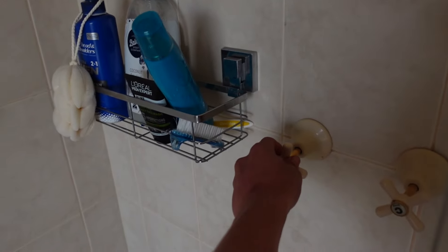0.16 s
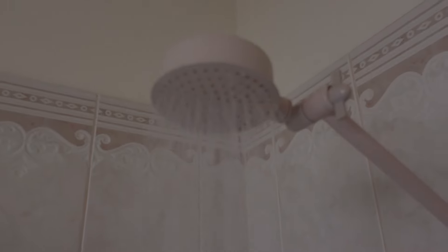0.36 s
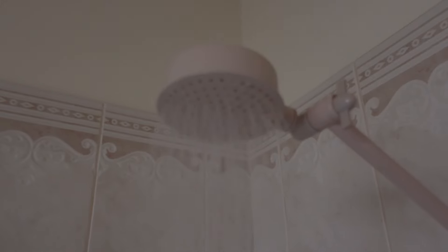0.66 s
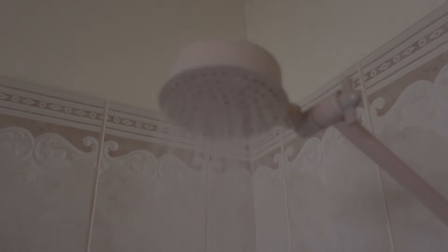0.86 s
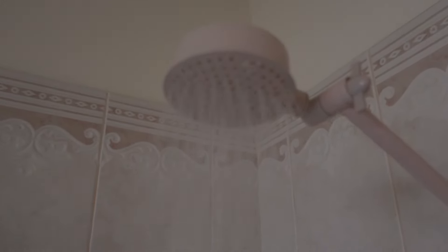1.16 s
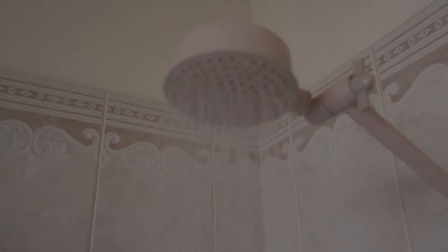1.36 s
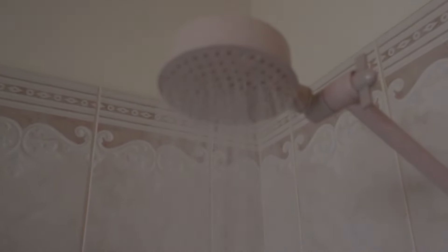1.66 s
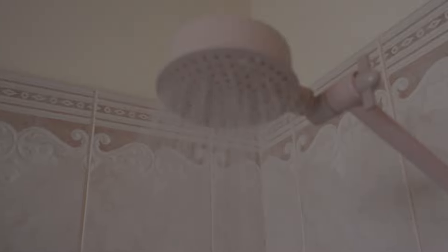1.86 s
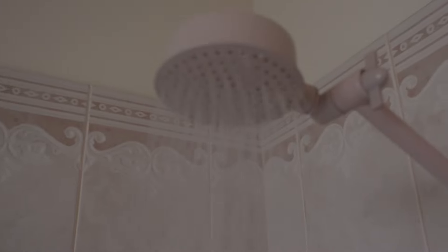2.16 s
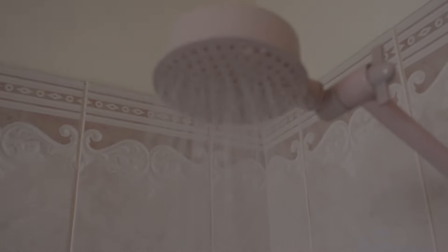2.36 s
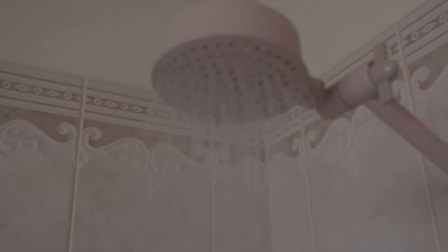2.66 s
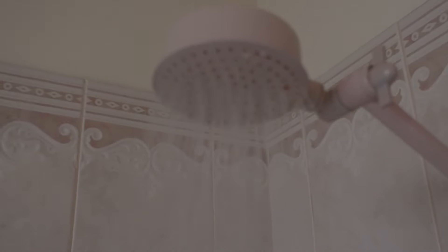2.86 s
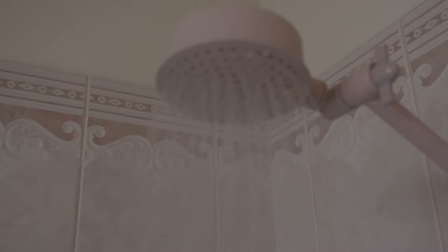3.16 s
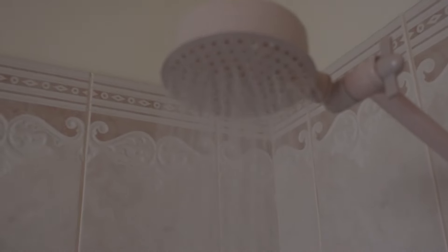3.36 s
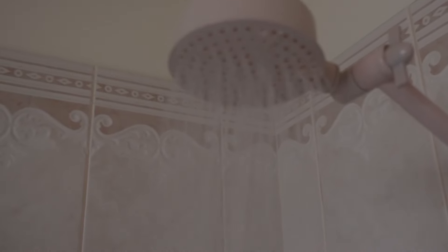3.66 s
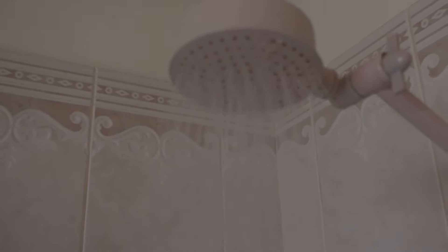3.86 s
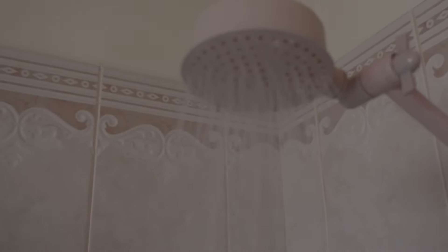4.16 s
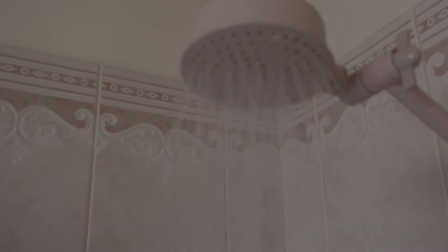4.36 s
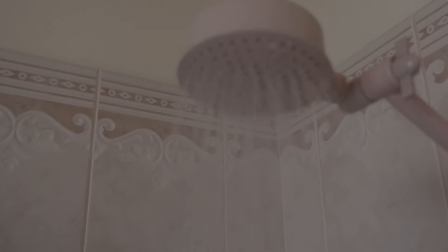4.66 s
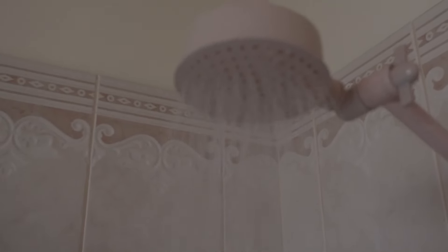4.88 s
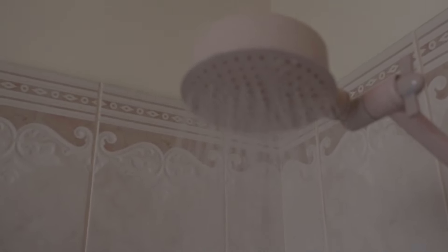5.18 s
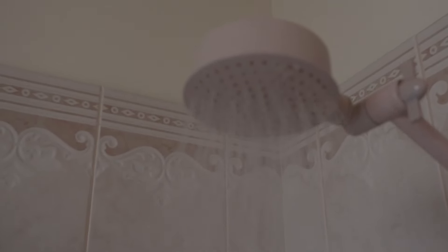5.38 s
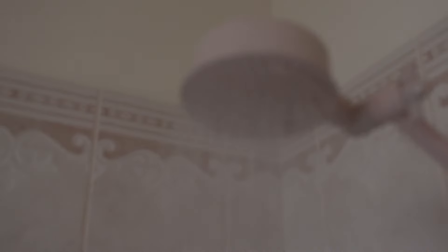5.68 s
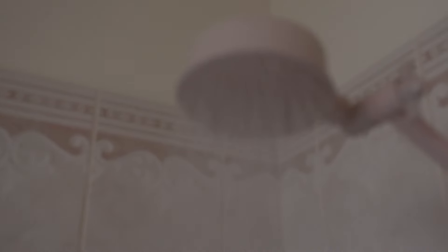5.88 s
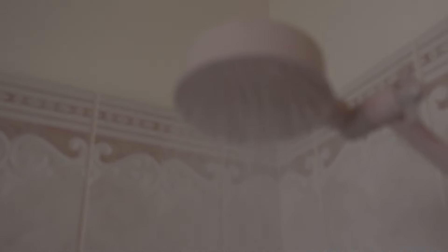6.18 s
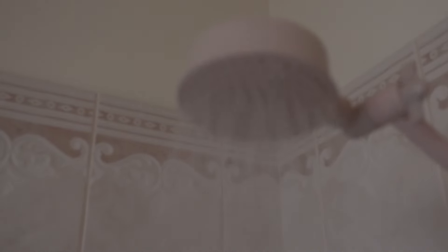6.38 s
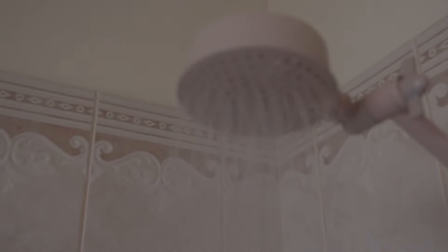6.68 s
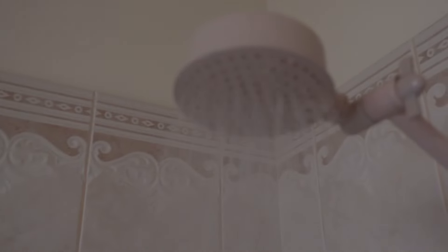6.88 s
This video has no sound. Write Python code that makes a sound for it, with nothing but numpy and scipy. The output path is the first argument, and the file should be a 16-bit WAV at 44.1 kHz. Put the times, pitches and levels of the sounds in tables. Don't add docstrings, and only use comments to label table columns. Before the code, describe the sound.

Close stereo microphone beside a tiled shower stall. Faint room air and small handle clicks last only a moment before a quick cut to full spray. The thin, bright hiss stays steady but flickers with small surges; heavy drops slap nearby, little hollow bubbles chirp and ring in the drain, and a low pipe note wavers underneath until the end, still running.

```python
import sys
import numpy as np
from scipy import signal
from scipy.io import wavfile
from scipy.ndimage import uniform_filter1d

SR = 44100
rng = np.random.default_rng(int(sys.argv[2]) if len(sys.argv) > 2 else 0)


def wav_out(sig):
    wavfile.write(sys.argv[1], SR, np.round(np.clip(np.atleast_2d(sig).T, -1, 1) * 32767).astype(np.int16))


def invert_db(x):
    u = np.asarray(x, float) / 20
    return 10 ** u


N = 310023

# (frequency [Hz], level per Hz [dB])
SPRAY_COLOUR = [(1060, -39), (1800, -11), (1940, -9), (2570, -2), (8750, 2), (14200, 0), (15300, -2),
                (15900, -6.5)]
# (frequency [Hz], width [Hz], level over the wash [dB])
STALL_RESONANCES = [(222, 25, 3), (265, 12, 8), (339, 14, 4), (552, 20, 5), (876, 20, 3), (1015, 22, 7),
                    (1055, 16, 6), (1188, 20, 2), (1641, 30, 4), (1712, 30, 3), (1752, 30, 3),
                    (2606, 20, 11)]


def evened(x):
    return x / np.sqrt(np.mean(x ** 2) + 1e-20)


def read(points, hz):
    f, value = np.transpose(points)
    return np.interp(np.log(hz + 1), np.log(f + 1), value)


def humps(modes, hz):
    power = 1
    for f, width, db in modes:
        power = power + invert_db(db) ** 2 / (1 + (2 * (hz - f) / width) ** 2)
    return np.sqrt(power)


def add(mix, s, sound, pan_db):
    part = mix[:, round(s * SR):][:, :sound.shape[-1]]
    sides = invert_db(np.array([[pan_db / 2], [-pan_db / 2]]))
    part += (sound * sides)[:, :part.shape[1]]


def high_passed(x, order, hz):
    return signal.sosfilt(signal.butter(order, hz, "highpass", fs=SR, output="sos"), x)


def chance(frames, bins, time_size, hz_size):
    field = rng.standard_normal((frames, bins)).T
    field = uniform_filter1d(field, hz_size, 0)
    return evened(uniform_filter1d(field, time_size, 1))


def wide_noise(gain, size):
    # (frequency [Hz], correlation [0-1])
    likeness = [(60, 0.96), (180, 0.99), (550, 0.9), (1650, 0.81), (4970, 0.69), (15000, 0.59)]
    # (frequency [Hz], left minus right [dB])
    balance = [(60, 0.0), (240, 0.0), (600, -1.2), (950, -0.8), (3770, -1.3), (15000, 1.2)]
    hz = np.fft.rfftfreq(size, 1 / SR)[:, None]
    a, b, c, d = rng.standard_normal(gain.shape[::-1] + (4,)).T
    same, lean = read(likeness, hz), invert_db(read(balance, hz) / 2)
    left = a + 1j * b
    right = same * left + np.sqrt(1 - same ** 2) * (c + 1j * d)
    z = np.array([left * lean, right / lean]) * gain
    return signal.istft(z, nperseg=size, noverlap=size * 3 // 4)[1][:, :N]


def burst(hz, turns, seed):
    t = np.arange(len(seed)) / SR
    ring = np.exp(-t * hz / turns) * np.sin(2 * np.pi * hz * t)
    pop = np.diff((1 - np.exp(-t * hz * 3)) * ring)
    rough = seed * (t / .0008) * np.exp(-t / 0.00078)
    x = np.convolve(rough, pop)[:len(seed)]
    return x / abs(x).max()


def quiet_room(air_db=-60):
    # (frequency [Hz], level per Hz [dB])
    air_colour = [(59, -67), (100, -28), (719, -3), (1030, -8), (1360, -5.5), (1990, -10), (3040, -12),
                  (3680, -19), (6250, -22), (15900, -30)]
    # (frequency [Hz], width [Hz], level over the air [dB])
    air_whistles = [(1370, 40, 15.5), (3050, 70, 11), (450, 88, 4.2)]
    # (time [s], peak level [dB], frequency [Hz], ring t60 [s])
    handle_clicks = [(.089, -30, 2970, .011), (.0892, -37, 1500, .024), (.089, -31, 5100, .0036),
                     (.0891, -36, 8500, .003), (.089, -42, 900, .012), (.0905, -35, 2100, .034),
                     (.0945, -24, 5200, .003), (.0945, -33, 9100, .0026), (.0945, -34, 2800, .006),
                     (.158, -50, 1300, .012), (.159, -53, 3000, .012), (.159, -55, 5200, .005),
                     (.159, -43, 430, .045), (.158, -50, 800, .01)]
    # (start [s], length [s], level [dB], from frequency [Hz], to frequency [Hz])
    squeak = (.192, .036, -61, 480, 760)
    hz = np.fft.rfftfreq(1024, 1 / SR)[:, None]
    patches = invert_db(2.0 * chance(60, 513, time_size=3, hz_size=12))
    gain = invert_db(read(air_colour, hz)) * humps(air_whistles, hz) * patches
    out = invert_db(air_db) * evened(wide_noise(gain, size=1024))

    t = np.arange(4000) / SR
    for s, db, f_hz, t60 in handle_clicks:
        onset = np.minimum(t * f_hz, 1)
        add(out, s, invert_db(db - 60 * t / t60) * onset * np.sin(2 * np.pi * f_hz * t), 0)

    s, length, db, from_hz, to_hz = squeak
    u = np.minimum(t / length, 1)
    turns = np.cumsum(from_hz + (to_hz - from_hz) * u ** .7) / SR
    add(out, s, invert_db(db) * np.sin(np.pi * u ** 1.5) * np.sin(2 * np.pi * turns), 0)
    return np.pad(out, ((0, 0), (0, N - out.shape[1])))


def hum_level(t, rise_db_per_s=350, fall_db_per_s=350, rest_db=-76):
    # (start [s], hold [s], level [dB])
    hum_spells = [(0.284, 0.076, -57), (0.462, .06, -58), (.58, 0.16, -54.5), (0.795, .05, -55),
                  (.9, 0.15, -62.5), (1.094, 0.33, -52), (1.51, 0.026, -59), (1.62, 0.17, -68),
                  (1.98, .12, -66), (2.186, 0.19, -56.5), (2.44, .07, -59), (2.56, 0.045, -53.5),
                  (2.676, .08, -55.5), (2.82, 0.17, -64.5), (3.3, .12, -68), (3.52, .15, -60.5),
                  (3.72, 0.062, -55), (3.847, 0.19, -61.5), (4.15, 0.12, -65.5), (4.35, .09, -58.5),
                  (4.505, 0.13, -58), (4.693, 0.22, -61.5), (5.0, 0.19, -58), (5.38, .1, -67),
                  (5.516, 0.09, -60), (6.52, .28, -68)]
    coarse = t[::64]
    start, hold, db = np.transpose(hum_spells)[:, :, None]
    rising_db = rise_db_per_s * np.maximum(start - coarse, 0)
    falling_db = fall_db_per_s * np.maximum(coarse - start - hold, 0)
    spell_db = (db - rising_db - falling_db).max(0)
    level = invert_db(np.maximum(spell_db, rest_db))
    return np.interp(t, coarse, uniform_filter1d(level, size=12))


def hum(note_hz=287, width_hz=4.4, wobble_db=1.1, rumble_db=-13):
    t = np.arange(N) / SR
    r = np.exp(-np.pi * width_hz / SR)
    wander = evened(signal.lfilter([1], [1, -r], rng.standard_normal(N)))
    wobble = uniform_filter1d(rng.standard_normal(N), size=1300)
    wobble = evened(uniform_filter1d(wobble, size=1300))
    side_phase = np.array([[.18], [-.18]])
    phase = 2 * np.pi * note_hz * t + 0.53 * wander + side_phase
    note = np.sqrt(2) * invert_db(wobble_db * wobble) * np.sin(phase)
    rumble = evened(signal.lfilter(*signal.iirpeak(101, 8, SR), rng.standard_normal(N)))
    level = hum_level(t)
    return level * note + invert_db(rumble_db) * np.sqrt(level * level.mean()) * rumble


def flow(t, surge_rise_s=0.014, wash_under_db=-10.5, wash_follows=0.85):
    # (time [s], spray level [dB], drop size as coarse over fine [dB])
    water_flow = [(.3, -31, -4.5), (.75, -32.5, -4.5), (1.1, -32, -2), (1.45, -31, -5), (1.75, -33.5, -3.5),
                  (2.0, -32, -2), (2.25, -34.5, -1.5), (2.42, -35.5, -2.5), (2.9, -31, -5),
                  (3.55, -32.5, -4), (4.1, -32, -3), (4.4, -31.5, -4), (4.72, -33.5, -4), (5.0, -31.5, -2),
                  (5.55, -32.5, 0), (6.0, -31.5, -1), (6.5, -32.5, -1), (7.03, -32, 0)]
    # (time [s], swell [dB], fade [s], coarse share [0-1])
    surges = [(.71, 12, 0.045, 0.98), (.86, 4.5, .06, 1), (1.15, 8, 0.014, 0.3), (1.26, 6, 0.097, 1),
              (1.4, 3.5, 0.053, 0.5), (1.54, 0, 0.036, 1), (1.85, 11, 0.092, 0.44), (2.15, 6.5, 0.18, 0.1),
              (2.61, 5, 0.026, 0), (2.82, 5.5, 0.1, 1), (3.07, 3.5, 0.036, 0.5), (3.82, 4.5, 0.067, .3),
              (4.26, 7, 0.023, 0), (4.475, 10.5, 0.13, 0.76), (4.83, 6.5, 0.13, 0.7), (5.09, 3, 0.077, 0),
              (5.65, 5.5, .15, 0.36), (6.17, -1.5, .05, 0.2), (6.549, 6, 0.16, 0.84)]
    s, level_db, coarse_db = np.transpose(water_flow)
    base_db, size_db = np.interp(t, s, level_db), np.interp(t, s, coarse_db)
    at, swell_db, fade_s, share = np.transpose(surges)[:, :, None]
    late = np.maximum(t - at, 0)
    swell = swell_db * np.minimum(late / surge_rise_s, 1) * np.exp(-late / fade_s)
    mist_db = base_db + (swell * (1 - share ** 2)).sum(0)
    spray_db = base_db + size_db + (swell * share).sum(0)
    usual_db = level_db.mean()
    wash_db = usual_db + wash_under_db + wash_follows * (base_db - usual_db)
    return mist_db, spray_db, wash_db


def wash(patchy_db=2.5, shake_follows=0.47, shake_hz=260):
    # (frequency [Hz], level per Hz [dB])
    wash_colour = [(30, -20), (60, -22), (100, -34), (175, -64), (215, -23), (400, -25.5), (500, -14.5),
                   (790, -9.5), (1000, -7.5), (1300, 2), (1500, -5.5), (2000, 0), (2600, -6.5), (4000, -27)]
    frames, hz = N // 512 + 5, np.fft.rfftfreq(2048, 1 / SR)[:, None]
    s = np.arange(frames) * 512 / SR
    field = invert_db(patchy_db * chance(frames, 1025, time_size=6, hz_size=14))
    shake = hum_level(np.arange(frames * 512) / SR)[::512]
    field = field * (shake / shake.mean()) ** (shake_follows / (1 + (hz / shake_hz) ** 6))
    gain = invert_db(read(wash_colour, hz)) * humps(STALL_RESONANCES, hz) * field
    water = evened(wide_noise(gain, size=2048))
    return water * invert_db(np.interp(np.arange(N) / SR, s, flow(s)[2]))


def ringing_stall(size, ring_db=-21, ragged_db=2):
    t = np.arange(size) / SR
    echoes = rng.standard_normal((2, size))
    echoes[1] = .8 * echoes[0] + .6 * echoes[1]
    for hz, width, db in STALL_RESONANCES:
        waver = evened(uniform_filter1d(rng.standard_normal(size), size=1500))
        turns = hz * t + rng.random() + np.array([[0], [.09]]) * rng.normal()
        echoes += invert_db(db + ring_db) * np.sin(2 * np.pi * turns + 0.94 * waver)
    return echoes * invert_db(ragged_db * chance(size, 1, time_size=700, hz_size=1))


def gulps(direct_db=25, bubble_s=0.0052, side_bubble_s=.002, splash_db=-12, splash_s=0.0012, rise=0.027,
          linger_db=-11, linger_times=2.3):
    # (time [s], peak level [dB], pitch [Hz], ring t60 [s])
    low_gulps = [
        (.784, -41, 583, 0.54),
        (3.34, -48, 540, 0.56),
        (4.339, -45, 590, .49),
        (4.89, -41.5, 690, 0.63),
        (5.643, -44.5, 502, 0.78),
    ]
    mid_gulps = [(1.25, -39.5, 1110, 1), (2.574, -37.5, 933, 0.56), (3.016, -37.5, 1090, 0.44),
                 (3.986, -28.5, 1100, 0.24), (4.297, -32.5, 1320, 0.33), (4.455, -21, 1020, 0.17),
                 (4.471, -13, 1030, 0.13), (4.494, -22, 1050, .15), (4.543, -24, 1000, 0.33),
                 (4.586, -22.5, 1010, 0.22), (4.655, -28, 993, 0.42), (4.868, -28.5, 1048, 0.55),
                 (5.254, -36, 1000, 0.23), (5.416, -33, 974, .67), (5.809, -27, 1126, 0.39),
                 (6.466, -34.5, 1016, 0.8), (6.587, -34, 1075, 0.38), (6.732, -27, 1100, 0.5),
                 (7.01, -28.5, 1124, .33)]
    high_gulps = [(.9363, -28, 1620, 0.27), (1.311, -24, 1640, 0.26), (2.612, -28.5, 1600, 0.13),
                  (2.628, -32, 1680, 0.28), (3.0, -35, 1760, 0.24), (3.273, -33, 1620, 0.34),
                  (3.8036, -33.5, 1840, 0.4), (4.2573, -34.5, 1660, 0.39), (4.534, -28.5, 1650, 0.22),
                  (4.818, -29.5, 1720, 0.29), (5.425, -31, 1660, 0.32), (5.6622, -30, 1650, 0.44),
                  (6.211, -29, 1750, 0.23), (6.568, -30, 1840, 0.24), (6.8823, -24.5, 1680, 0.23)]
    top_gulps = [(1.965, -29, 2600, .2), (3.467, -32, 2510, .58), (3.967, -31, 2370, 0.25),
                 (4.3797, -31.5, 2500, 0.88), (4.4813, -23.5, 2610, 0.16), (4.5321, -25.5, 2630, 0.24),
                 (5.361, -27, 2660, 0.3), (5.576, -26.5, 2610, 0.2), (5.69, -28, 2850, .15),
                 (5.721, -28, 2950, 0.16), (5.74, -32.5, 2620, 0.35), (6.05, -23.5, 2610, 0.079),
                 (6.1962, -22, 2570, 0.23), (6.327, -31.5, 2610, .2), (6.349, -28.5, 2610, 0.15),
                 (6.394, -34, 2630, 0.11), (6.52, -29, 2615, 0.38), (6.7313, -37, 2620, 0.39),
                 (6.831, -30, 2520, 0.22)]
    side_gulps = [(4.456, -26.5, 1300, 0.27), (4.527, -24.5, 1310, 0.38), (4.1, -37.5, 920, 0.41),
                  (3.81, -31.5, 930, 0.34), (4.5, -36, 940, .3), (1.546, -25, 3800, .12),
                  (1.575, -30, 4270, 0.23), (1.549, -25.5, 3300, 0.14), (1.556, -33, 5500, .2),
                  (4.53, -29, 1880, .25), (4.55, -31, 1470, 0.18), (2.45, -47, 650, 0.51),
                  (2.6, -47, 500, 0.94), (6.6, -31, 1350, 0.28), (6.76, -32, 1560, 0.32),
                  (4.8, -32, 2250, .25), (6.05, -29.5, 2300, .2), (5.529, -39, 2400, .06),
                  (5.786, -27.5, 2100, 0.068), (3.39, -43, 450, .15), (2.9, -26, 2200, 0.12),
                  (3.6, -44, 470, .1), (6.4, -33, 3100, 0.4), (6, -35, 3400, 0.26),
                  (6.735, -31.5, 950, 0.81), (7.1, -43, 1270, .18), (.29, -38, 890, 0.97),
                  (3.12, -32, 3300, 0.36), (1.8, -27, 2900, 0.062), (3.3, -27, 2250, .05),
                  (6.5, -37, 2500, .15), (4.48, -25.5, 2960, 0.13), (1.985, -31.5, 2420, .2),
                  (1.862, -29, 2060, 0.068)]
    # (pitch [Hz], left minus right [dB])
    gulp_balance = [(600, 0.5), (1000, -0.5), (2600, -3)]
    size, out = 20000, np.zeros((2, N))
    t = np.arange(size) / SR
    short_t = t[:3000]
    echoes = ringing_stall(size)
    main = low_gulps + mid_gulps + high_gulps + top_gulps
    for k, (s, db, pitch_hz, t60) in enumerate(main + side_gulps):
        decay_db = -60 * t / t60
        decay = invert_db(decay_db) + invert_db(linger_db + decay_db / linger_times)
        room = np.roll(echoes, rng.integers(size), axis=1) * decay
        room[:, 0] += invert_db(direct_db)

        u = short_t / (bubble_s if k < len(main) else side_bubble_s)
        v = short_t / splash_s
        shape = u * np.exp(-u * 2) + invert_db(splash_db) * v * np.exp(1 - v)
        bubble = shape * np.sin(2 * np.pi * pitch_hz * short_t * (1 - rise / 2 + rise * u / 2))
        x = signal.fftconvolve(room, bubble[None], axes=1)[:, :size]
        add(out, s - .003, invert_db(db) * x / abs(x.mean(0)).max(), read(gulp_balance, pitch_hz))
    return high_passed(out, 2, 350)


def smack(slap_s=0.0023, lean_db=-3, thump_db=-42, thump_s=.012):
    # (time [s], peak level [dB], frequency [Hz])
    slaps = [
        (2.4782, -24, 2800),
        (2.4797, -20, 2300),
        (2.4815, -13.5, 3600),
        (2.4814, -14, 2300),
        (2.4836, -13, 2600),
        (2.4845, -17, 1550),
        (2.4838, -21, 4100),
    ]
    # (time [s], peak level [dB], frequency [Hz])
    knock = (3.2895, -30, 1100)
    out, t = np.zeros((2, N)), np.arange(2500) / SR
    for s, db, hz in slaps:
        swell = np.sin(np.pi * np.minimum(t / slap_s, 1))
        add(out, s, invert_db(db) * np.sin(2 * np.pi * hz * t) * swell, lean_db)
    out = high_passed(out, 4, 1250)
    s, db, hz = knock
    add(out, s, invert_db(db) * np.sin(2 * np.pi * np.minimum(hz * t, 1)), 0)
    push = np.sin(np.pi * np.minimum(t / thump_s, 1)) ** 2
    add(out, slaps[2][0], invert_db(thump_db) * push, 0)
    return out


def splats(spray_db=-17, spray_s=0.015, trim_db=-3.5):
    # (time [s], peak level [dB], centre frequency [Hz])
    large_splats = [(0.3177, -14.7, 8130.0), (0.3654, -16, 4700.0), (0.411, -18, 9690.0),
                    (0.5079, -22, 8780.0), (0.5295, -19, 10090.0), (0.563, -22, 6300.0),
                    (0.587, -17, 10360.0), (0.6392, -15, 8270.0), (0.6921, -14.2, 7760.0),
                    (0.7165, -9.5, 12150.0), (0.7911, -17, 8870.0), (0.8591, -12.5, 6880.0),
                    (0.8681, -15, 4860), (0.9303, -18.2, 6300), (0.9711, -13, 10140.0),
                    (0.9859, -16, 4380.0), (1.0452, -14.5, 6270.0), (1.0645, -16, 9160.0),
                    (1.1205, -19, 11770.0), (1.1287, -16, 4400), (1.1459, -14, 11110.0),
                    (1.1694, -10, 12860.0), (1.2159, -19, 10460.0), (1.2723, -13.5, 9800),
                    (1.4097, -9.5, 8970.0), (1.4276, -10, 11440.0), (1.4991, -13, 10200.0),
                    (1.512, -7.5, 13680.0), (1.5459, -16, 4180.0), (1.5539, -25, 5790.0),
                    (1.6499, -22, 8670.0), (1.7236, -15, 11400), (1.75, -16, 9620.0),
                    (1.8563, -15.1, 8820.0), (1.872, -10.4, 9700.0), (1.892, -13, 8350.0),
                    (2.0471, -24, 7300.0), (2.0583, -10, 10990.0), (2.0726, -21, 6090.0),
                    (2.0873, -18.3, 8610.0), (2.1576, -13, 10470.0), (2.1734, -17, 10450.0),
                    (2.2106, -19, 8450.0), (2.4208, -18, 10800.0), (2.4562, -17.5, 8650.0),
                    (2.6204, -10.2, 11440.0), (2.6376, -13.5, 9860.0), (2.7049, -13, 13070.0),
                    (2.7739, -14, 12010.0), (2.7839, -19.4, 11300.0), (2.8264, -11, 5770),
                    (2.875, -11.5, 11100), (2.9557, -15, 8000.0), (3.0164, -14, 6040.0),
                    (3.0714, -14, 6530.0), (3.0995, -13, 8720.0),
                    (3.2116, -16, 8050.0), (3.247, -21, 6550.0), (3.3192, -16.6, 8150.0),
                   (3.3554, -13, 11360.0), (3.4174, -14, 8690.0), (3.4834, -18.8, 7430.0),
                   (3.4963, -18.3, 11910.0), (3.5127, -16, 10970.0), (3.5574, -21, 8850.0),
                   (3.5843, -16.8, 9890.0), (3.6452, -14.5, 11180.0), (3.6578, -17, 10510.0),
                   (3.6922, -18, 8310.0), (3.8139, -18.9, 9290.0), (3.8335, -15, 8200.0),
                   (3.9162, -15, 7980.0), (3.9572, -21, 8160.0), (4.0071, -16, 10850.0),
                   (4.0451, -15, 9640.0), (4.1078, -20.1, 7990.0), (4.1308, -16, 5840.0),
                   (4.1982, -12, 11570.0), (4.2741, -9, 10900), (4.288, -14.7, 10540.0),
                   (4.403, -20, 10740.0), (4.4181, -17.5, 12060.0), (4.485, -6, 7150.0),
                   (4.531, -17.1, 6640.0), (4.6378, -14, 7150), (4.6956, -25, 11380.0),
                   (4.7151, -18, 8300.0), (4.776, -11.5, 8750), (4.8194, -12, 9300.0),
                   (4.8406, -18, 12420.0), (5.0047, -14, 10230.0), (5.0357, -13.7, 12000),
                   (5.093, -14.2, 5510.0), (5.107, -6.5, 7800.0), (5.1566, -13, 10100.0),
                   (5.171, -15, 10720.0), (5.3453, -16, 11770.0), (5.4025, -10, 10860.0),
                   (5.5796, -21, 3440.0), (5.6553, -8.5, 8600), (5.684, -14.3, 10770.0),
                   (5.7373, -13.9, 7720.0), (5.8262, -16.0, 10820.0), (5.8457, -13.7, 10560.0),
                   (5.86, -15.9, 10640.0), (6.0133, -11, 11650.0), (6.1731, -13, 11730.0),
                   (6.1889, -16.2, 11100), (6.3102, -14, 9860.0), (6.418, -27, 12220.0),
                   (6.571, -13, 10630.0), (6.908, -14, 7500)]
    out, t = np.zeros((2, N)), np.arange(2500) / SR
    rows = large_splats
    seeds = rng.standard_normal((len(rows), 2, 2500))
    for (s, db, hz), (seed, fizz) in zip(rows, seeds):
        pop = burst(hz, .8, seed[:400])
        grain = pop[:60] / np.linalg.norm(pop[:60])
        tail = np.convolve(fizz * np.exp(-t / spray_s), grain)[:2500]
        splat = np.pad(pop, (0, 2100)) + invert_db(spray_db) * tail
        add(out, s, invert_db(db + trim_db) * splat, seed[-1] - .4)
    return high_passed(out, 2, 600)


def drops(per_s=500, spread_db=6, level_db=-42, clumping=1.5):
    s = np.arange(0, N + 64, 64) / SR
    surge = invert_db(clumping * np.interp(np.arange(N) / SR, s, flow(s)[0]))
    size = invert_db(spread_db * np.minimum(rng.exponential(1, N), 3.5))
    size = size * (rng.random(N) < per_s / SR * surge / surge.mean())
    kind, out = rng.integers(0, 24, N), np.zeros((2, N))
    for k, hz in enumerate(np.geomspace(1500, 13500, 24)):
        pop = evened(burst(hz, 0.75, rng.standard_normal(300)))
        pop = pop * invert_db(read(SPRAY_COLOUR, hz)) * np.sqrt(hz)
        add(out, 0, signal.oaconvolve(size * (kind == k), pop)[:N], 3 * rng.normal())
    return invert_db(level_db) * evened(out)


def band_share(gain, hz, lo_hz, hi_hz):
    inside = 1 / (1 + (lo_hz / (hz + 1)) ** 8) / (1 + (hz / hi_hz) ** 8)
    return inside / np.sum(gain ** 2 * inside)


def hiss(patchy_db=1.06, flicker_db=1.225, gust_db=0.28):
    frames, hz = N // 64 + 5, np.fft.rfftfreq(256, 1 / SR)[:, None]
    mist_db, coarse_db, _ = flow(np.arange(frames) * 64 / SR)
    colour = invert_db(read(SPRAY_COLOUR, hz))
    mist, coarse = invert_db(mist_db) ** 2, invert_db(coarse_db) ** 2
    power = band_share(colour, hz, 6000, 21000) * mist + band_share(colour, hz, 2000, 6000) * coarse

    clumps = rng.exponential(1, (frames, 4)).T ** 2
    clumps = signal.lfilter([1], [1, -.7], uniform_filter1d(clumps, size=6))
    together = clumps.sum(0) - clumps.sum(0).mean()
    clumps = np.repeat(clumps - clumps.mean(), 33, 0)[:129] + 0.27 * together

    field_db = patchy_db * chance(frames, 129, time_size=40, hz_size=5)
    field_db = field_db + flicker_db * evened(clumps)
    field_db = field_db + gust_db * chance(frames, 129, time_size=35, hz_size=60)
    spray = wide_noise(colour * np.sqrt(power) * invert_db(field_db), size=256)
    return evened(spray) * np.sqrt(np.mean(mist + coarse))


def scene(change_s=.255):
    # (time [s], gain [ratio])
    fade = [
        (0, 1),
        (.228, 1),
        (.254, 0),
        (.258, 0),
        (.263, .45),
        (.282, 1),
    ]
    t = np.arange(N) / SR
    shower = hum() + wash() + gulps() + smack() + splats() + drops() + hiss()
    return np.where(t < change_s, quiet_room(), shower) * np.interp(t, *np.transpose(fade))


def band_limit(x):
    return signal.sosfilt(signal.butter(12, 16500, fs=SR, output="sos"), x)


def record(dry):
    thin = high_passed(dry, 2, 220)
    edge = signal.firwin(1023, 15960, window=("kaiser", 9), fs=SR)
    mix = signal.oaconvolve(thin, edge[None], "same")
    return band_limit(mix)


dry = scene()
out = record(dry)
wav_out(out)
```